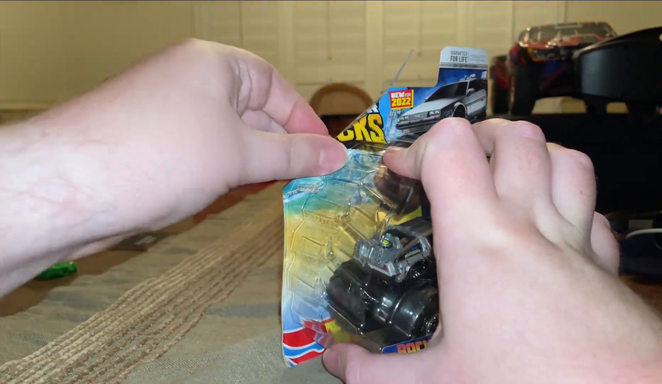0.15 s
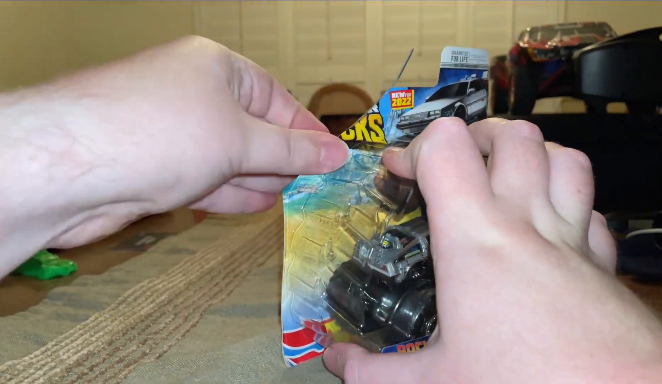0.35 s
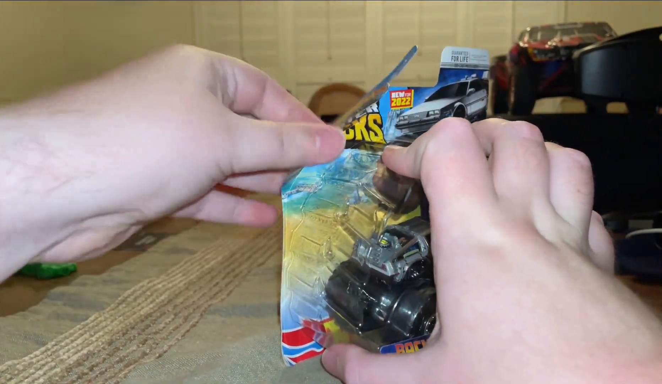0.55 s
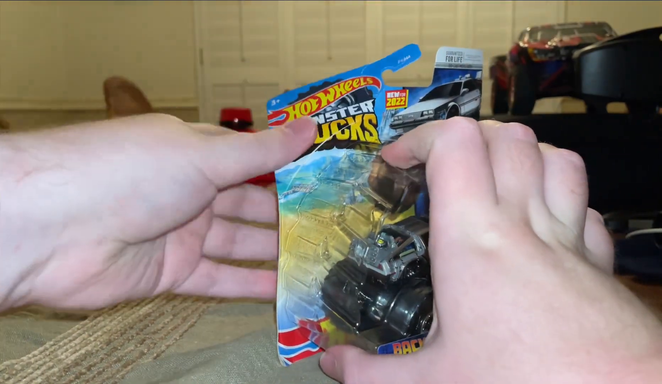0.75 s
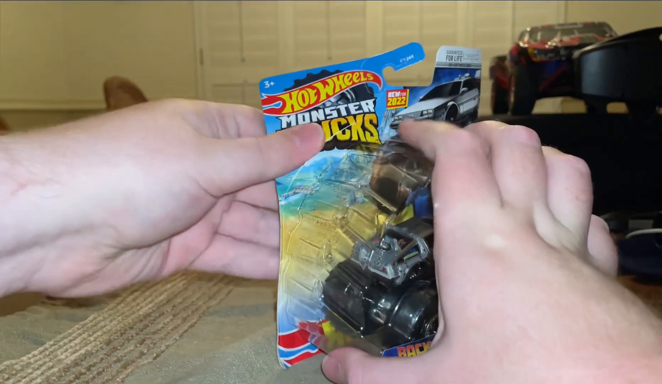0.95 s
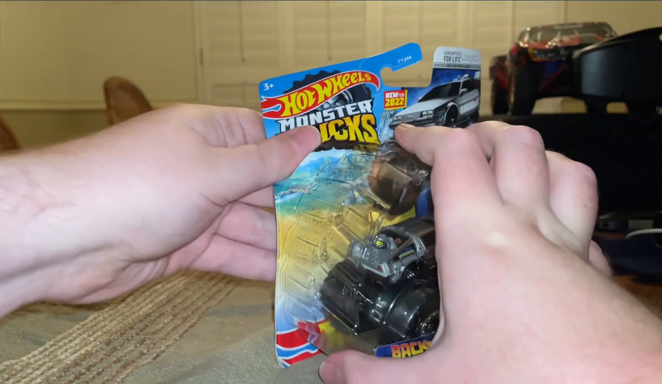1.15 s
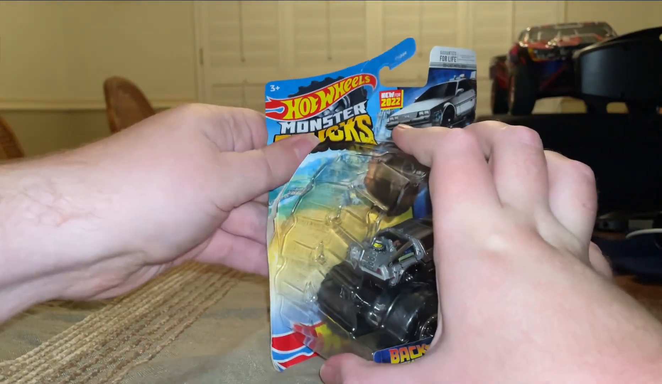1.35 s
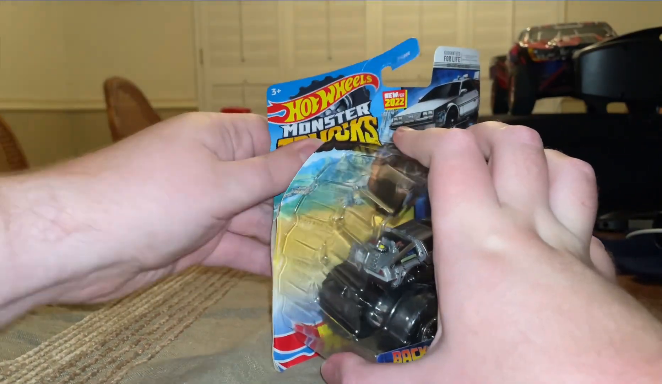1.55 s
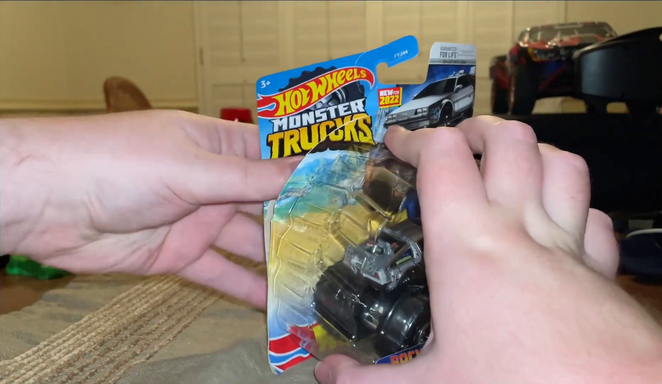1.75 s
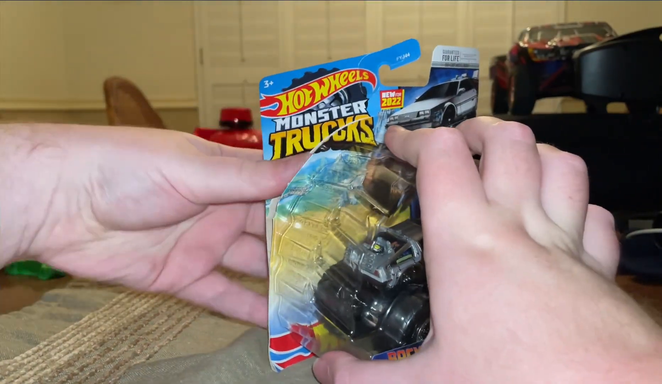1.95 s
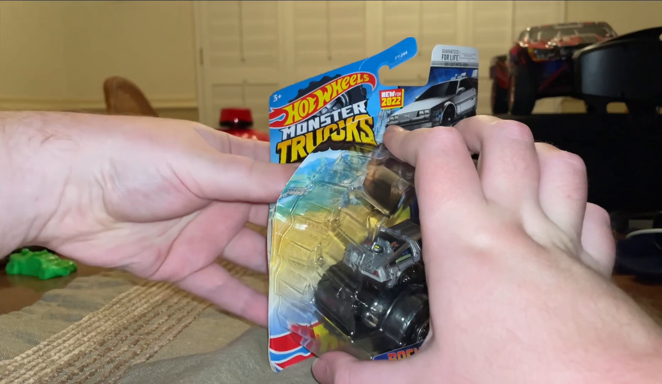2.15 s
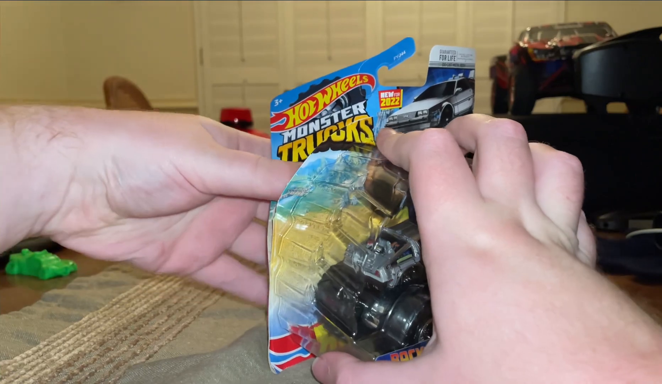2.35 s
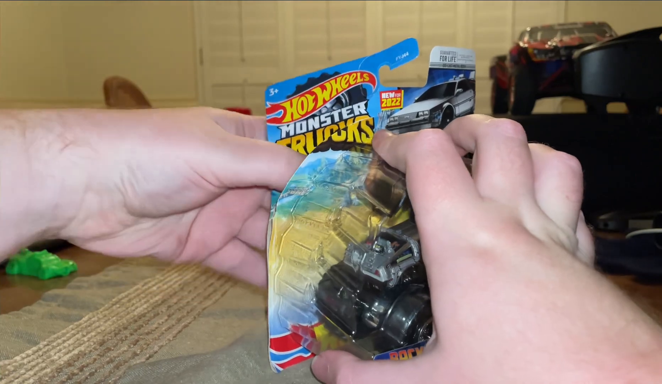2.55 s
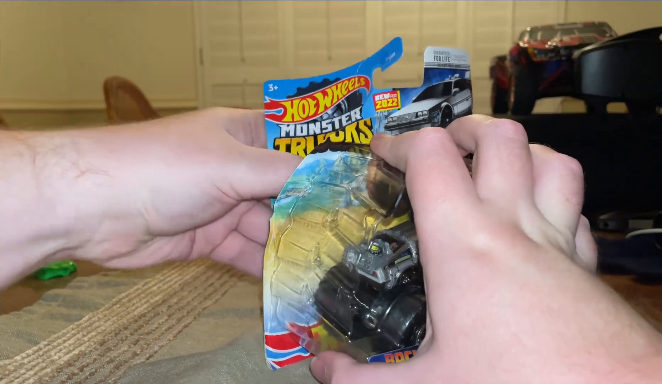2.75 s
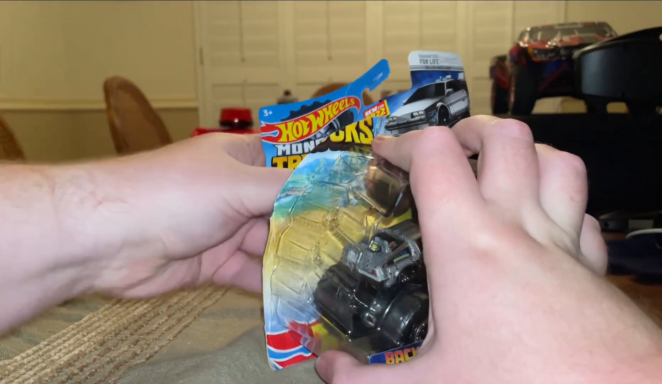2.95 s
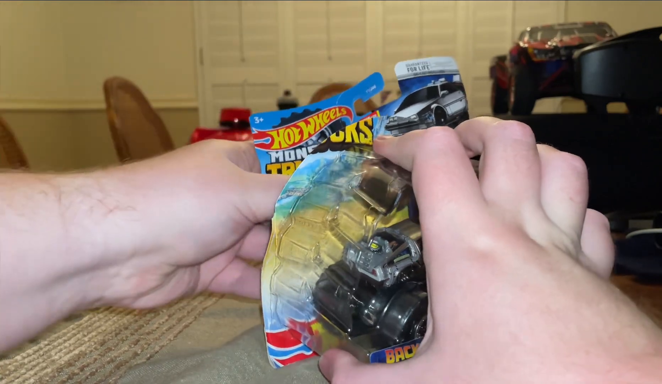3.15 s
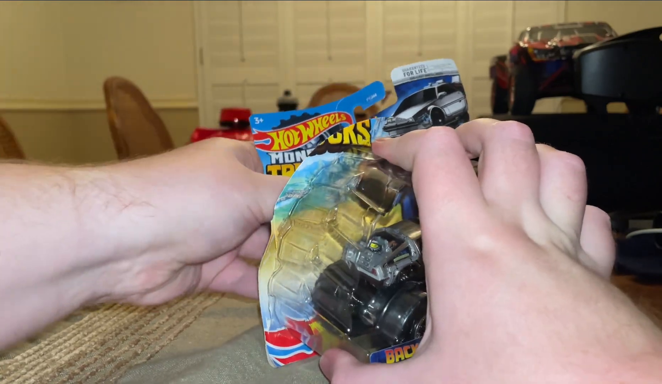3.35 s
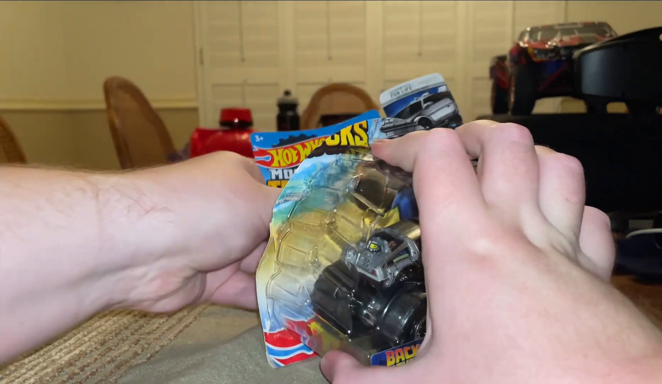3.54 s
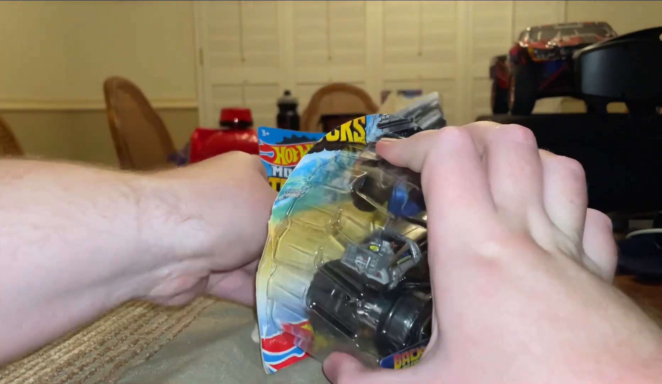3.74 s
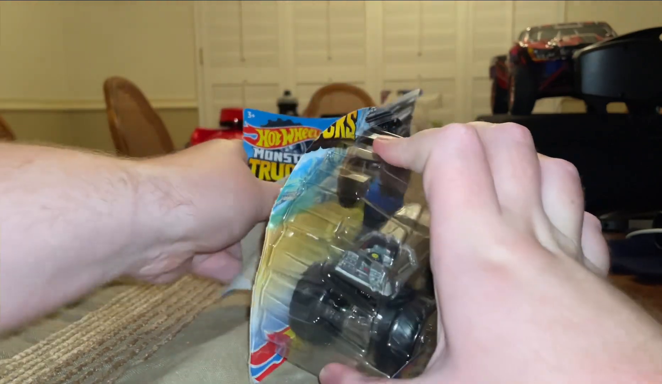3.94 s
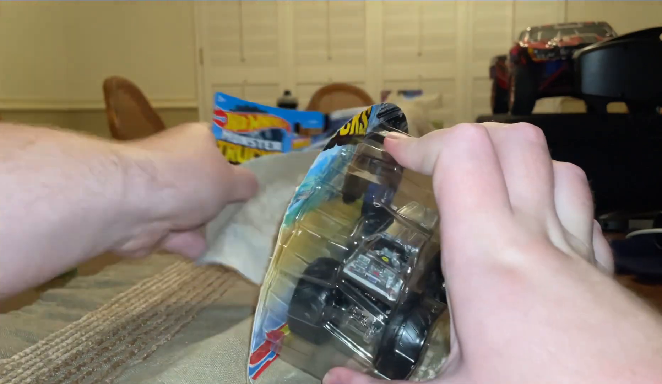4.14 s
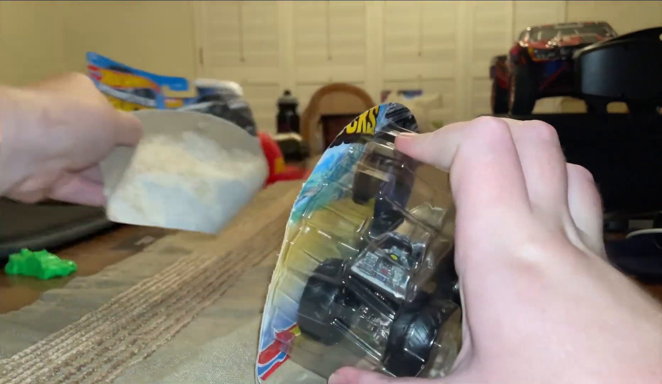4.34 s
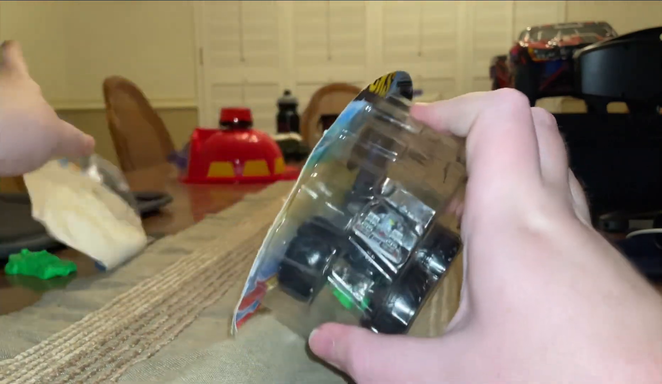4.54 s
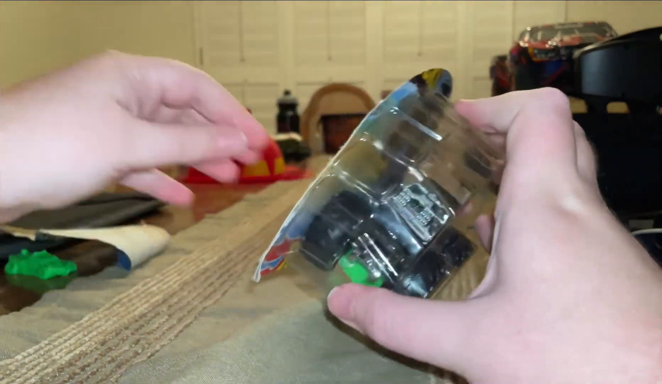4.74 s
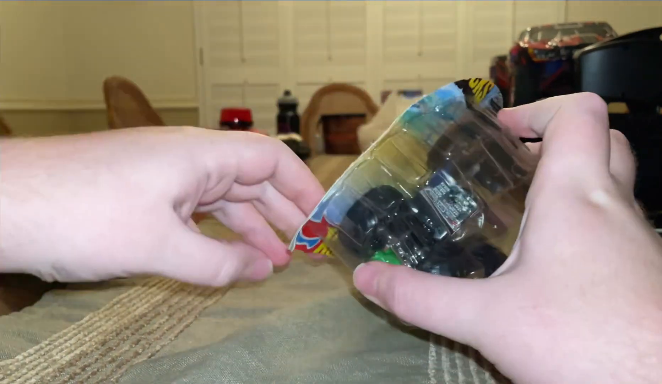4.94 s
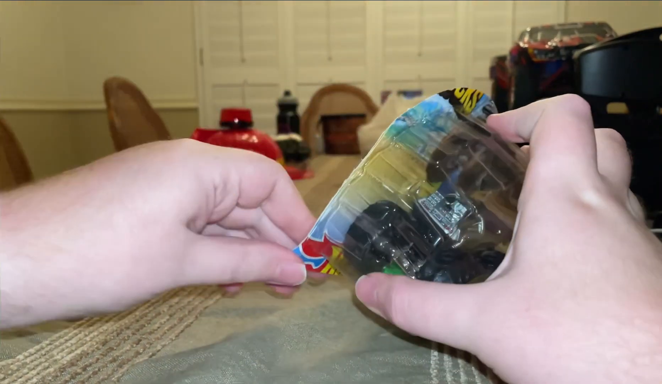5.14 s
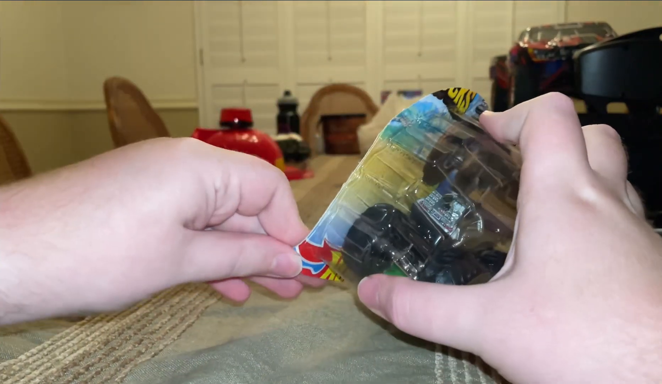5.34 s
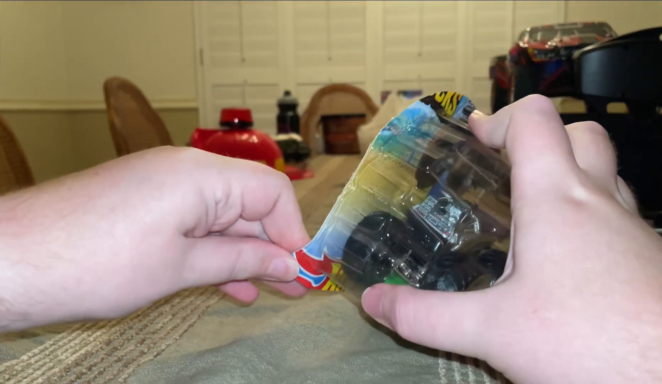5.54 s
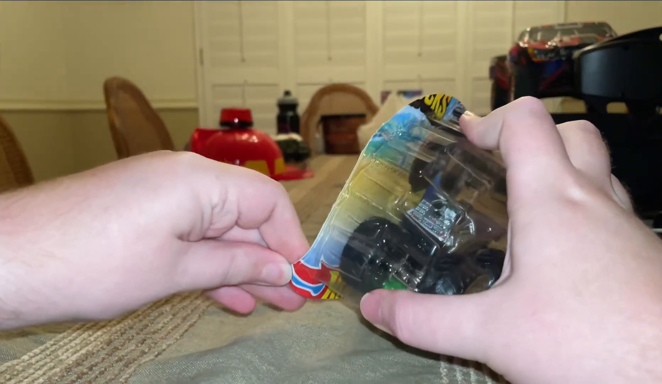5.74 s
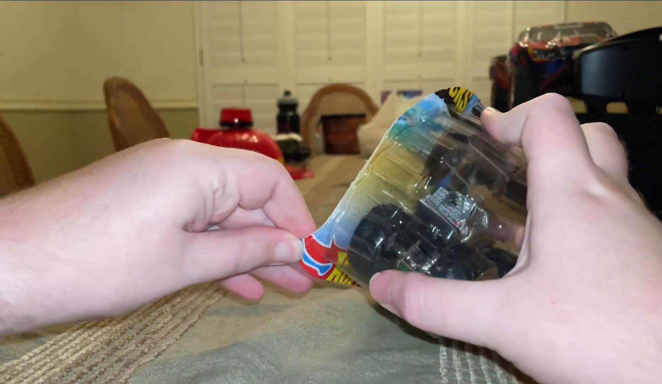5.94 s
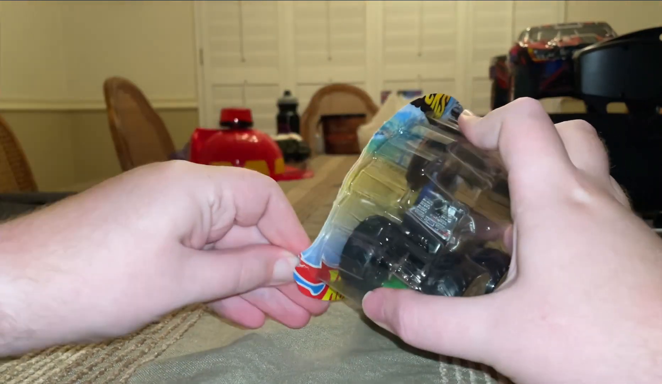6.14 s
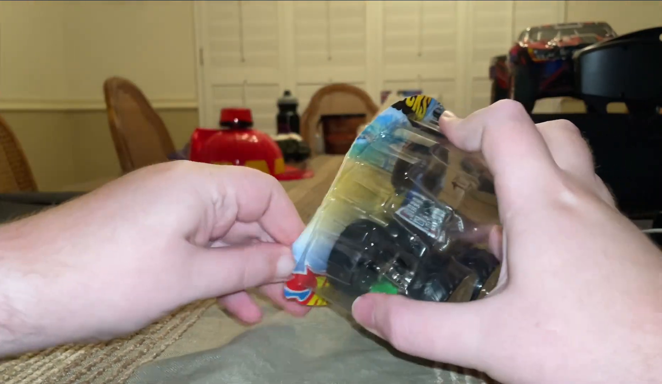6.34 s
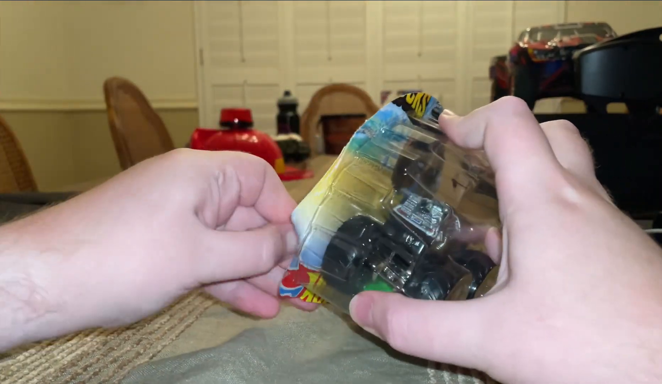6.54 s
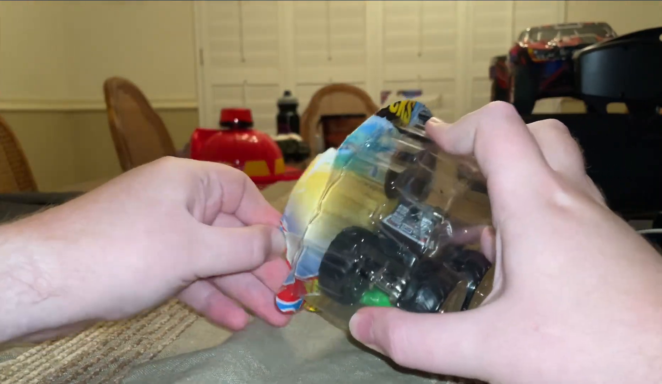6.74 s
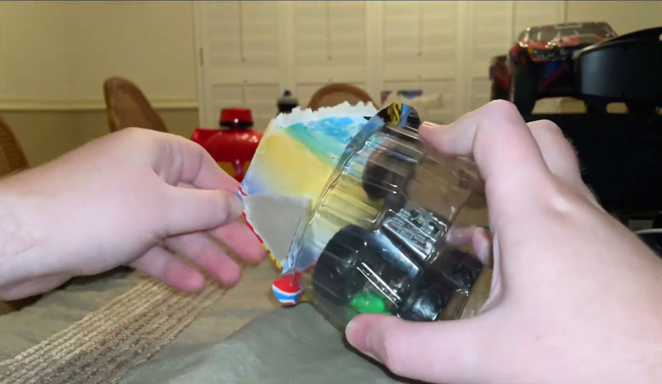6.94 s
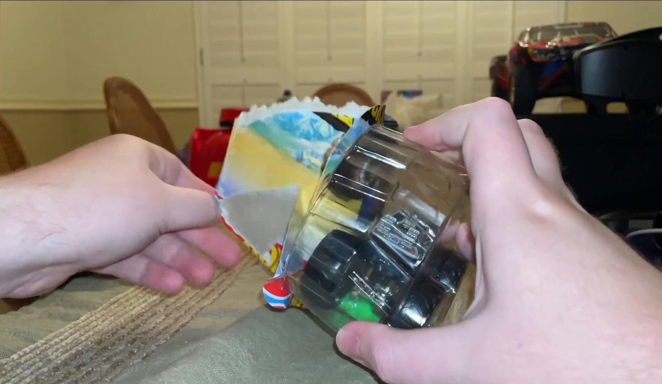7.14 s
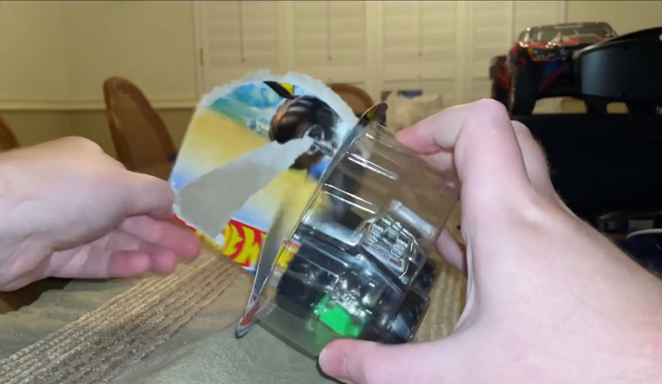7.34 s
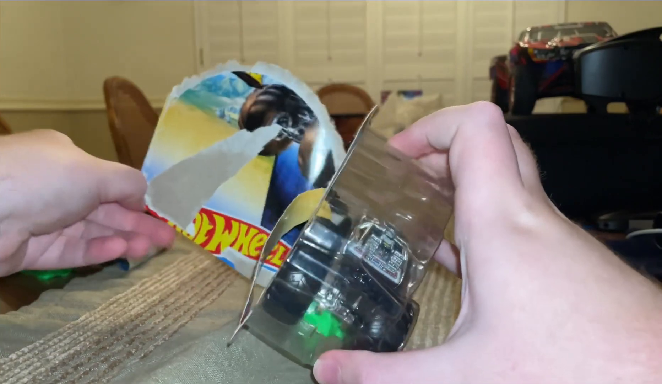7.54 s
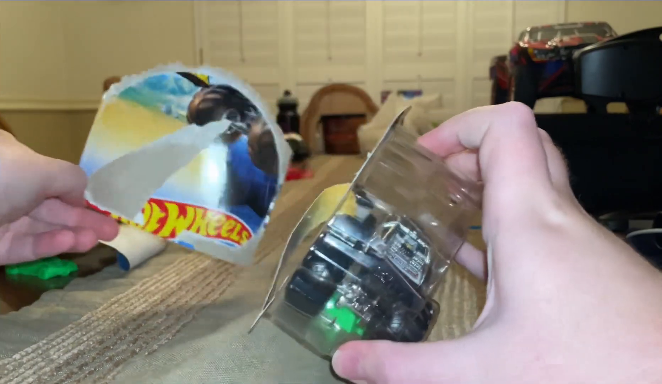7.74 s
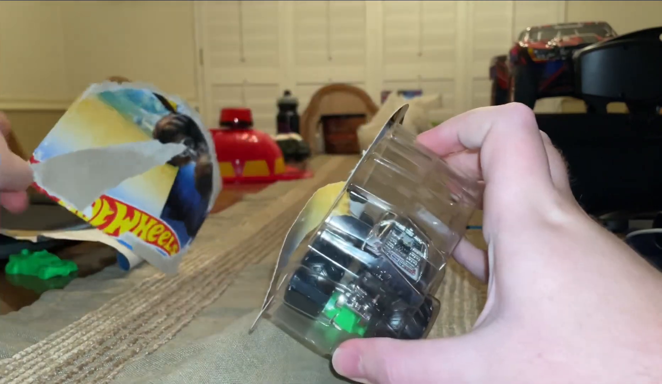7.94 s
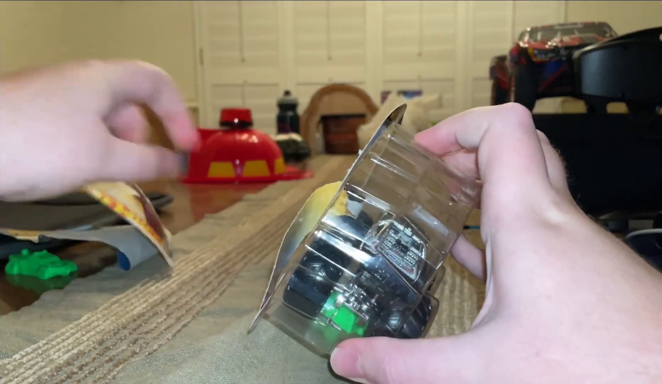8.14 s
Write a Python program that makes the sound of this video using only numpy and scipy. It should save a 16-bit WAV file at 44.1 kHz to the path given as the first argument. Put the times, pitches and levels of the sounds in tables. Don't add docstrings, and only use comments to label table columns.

```python
import sys
import numpy as np
from scipy import signal
from scipy.fft import rfft, irfft, next_fast_len
from scipy.io import wavfile
from scipy.ndimage import uniform_filter1d, map_coordinates

SR = 44100
rng = np.random.default_rng(int(sys.argv[2]) if len(sys.argv) > 2 else 0)


def ratio(d):
    e = np.asarray(d, float) / 20
    return 10 ** e


def output_pcm(signal):
    pcm = np.clip(np.atleast_2d(signal).T, -1, 1) * 32767
    wavfile.write(sys.argv[1], SR, np.round(pcm).astype(np.int16))


N = 361179


def unit(x):
    return x / np.sqrt(np.mean(x ** 2) + 1e-20)


def along(points, hz):
    f, v = np.transpose(points)
    return np.interp(np.log(hz + 1), np.log(f + 1), v)


def wobble(rate):
    knots = rng.standard_normal(int(N * rate / SR) + 4)
    return map_coordinates(knots, [np.arange(N) * rate / SR])


def filtered(x, response):
    m = next_fast_len(N + SR // 2)
    hz = np.fft.rfftfreq(m, 1 / SR)
    return irfft(rfft(x, m) * response(hz), m)[..., :N]


def resonant(modes):
    def response(f):
        total = 0
        for k, (centre, width, db) in enumerate(modes):
            total = total + (-1) ** k * ratio(db) * 1j * f * width / (centre ** 2 - f * f + 1j * f * width)
        return total
    return response


def narrow(hz, width_hz, size):
    pole = np.exp(-np.pi * width_hz / SR)
    poles = [1, -2 * pole * np.cos(2 * np.pi * hz / SR), pole ** 2]
    return unit(signal.lfilter([1, 0, -1], poles, rng.standard_normal(size)))


def swell(t, peak, rise, t60):
    return np.where(t < peak, np.exp((t - peak) / rise), ratio(-60 * (t - peak) / t60))


# frequency in Hz, likeness from -1 to 1.
LIKENESS = [(100, .3), (800, .8), (2000, .42), (4500, .2), (8000, .6), (10200, .97), (13000, .97),
            (16000, .9)]


def spread(pair, response):
    def middle_and_side(hz):
        turn = np.arccos(np.clip(along(LIKENESS, hz), -1, 1)) / 2
        return response(hz) * np.array([np.cos(turn), np.sin(turn)])
    mid, side = filtered(pair, middle_and_side)
    return np.array([mid + side, mid - side])


# frequency in Hz, level in dB per Hz.
AIR_COLOUR = [(15, -39), (25, -3), (175, -8), (217, -11.5), (317, -9), (545, -29.5), (3520, -36.5),
              (7710, -49.5), (11600, -53), (14400, -41), (16000, -49)]
# pitch in Hz, level in dB rms.
HUM_TONES = [(161.5, -68), (242.2, -71), (355.3, -71.5)]


def household():
    a, b = filtered(rng.standard_normal((2, N)), lambda hz: ratio(along(AIR_COLOUR, hz)))
    air = ratio(-58.0 + 0.57 * wobble(1.3)) * unit(np.array([a + 0.64 * b, a - 0.86 * b]))
    t = np.arange(N) / SR
    hum = np.zeros(N)
    for hz, db in HUM_TONES:
        level = ratio(db + 4.5 + 2.0 * wobble(3.5))
        hum += level * np.sin(2 * np.pi * hz * t + .6 * wobble(6))
    return air + hum


# frequency in Hz, time to fall 60 dB in seconds.
ROOM_DECAY = [(100, 0.89), (500, 0.082), (1000, 0.5), (2000, 0.32), (6000, 0.63), (12000, 0.095)]
# frequency in Hz, level in dB.
ROOM_LEVEL = [(100, -16), (600, -10.5), (1100, -14.5), (1450, -15), (2200, -11), (6000, -16),
              (12000, -16.5)]


def room(x):
    out, step, delay = np.zeros((2, N + 2 * SR)), SR // 3, 200
    for start in range(0, N, step):
        hz, t, z = signal.stft(rng.standard_normal((2, SR // 2)), SR, nperseg=256)
        decay = ratio(-60 * t / along(ROOM_DECAY, hz)[:, None])
        tail = signal.istft(z * decay, SR, nperseg=256)[1]
        tail = tail / np.linalg.norm(tail[0])
        wet = signal.fftconvolve(x[None, start:start + step], tail, axes=1)
        out[:, start + delay:start + delay + wet.shape[1]] += wet
    return spread(out[:, :N], lambda hz: ratio(along(ROOM_LEVEL, hz)))


# peak time in seconds, peak level in dB.
TABLE_KNOCKS = [(0.672, -41.5), (1.303, -48), (1.601, -28), (2.418, -39.5), (3.136, -50.5), (3.348, -51.5),
                (3.646, -29.5), (3.746, -32), (3.848, -30), (4.066, -40.5), (4.18, -42), (4.89, -35),
                (6.496, -26.5), (6.819, -23), (7.006, -54), (7.132, -47.5), (7.207, -23.5), (7.365, -21.5),
                (7.644, -22)]


def thuds():
    out, t, peak = np.zeros(N + SR), np.arange(SR // 4) / SR, .03
    for s, db in TABLE_KNOCKS:
        boom = narrow(86, 75, len(t)) * swell(t, peak, 0.037, 0.037)
        out[round((s - peak) * SR):][:len(t)] += ratio(db - 7.5) * boom
    return out[:N]


# peak time in seconds, growing time in seconds, level in dB, pitch in Hz,
# time to fall 60 dB in seconds.
FINGER_DRAGS = [(0.348, 0.12, -52.5, 9900, .05), (.665, .006, -35, 620, 0.11),
                (.69, 0.021, -31.5, 340, 0.29), (1.02, 0.011, -42, 1090, 0.36),
                (1.02, 0.014, -55, 2370, 0.26), (1.288, 0.23, -47.5, 6800, .05),
                (1.89, 0.057, -32.5, 964, 0.056), (1.9, 0.054, -50.5, 4600, .05),
                (1.898, .05, -53, 5960, .05), (2.022, .03, -42, 940, .08), (2.02, 0.033, -47.5, 5000, .06),
                (3.36, 0.014, -27, 344, 0.36), (5.42, .08, -73, 6530, .05)]


def drags():
    growth_db, sharpness = 11.5, 20
    out = np.zeros(N + SR)
    for end, length, db, hz, t60 in FINGER_DRAGS:
        t = np.arange(SR // 2) / SR - length
        stroke = np.where(t < 0, ratio(growth_db * t / length), ratio(-60 * t / t60))
        stroke = stroke * np.minimum((t + length) / .01, 1)
        hiss = narrow(hz, hz / sharpness, len(t))
        out[round((end - length) * SR):][:len(t)] += ratio(db) * stroke * hiss
    return out[:N] * ratio(2 * wobble(87))


# peak time in seconds, peak level in dB, pitch in Hz, time to fall 60 dB in seconds,
# level of the edge crack in dB.
PANEL_SNAPS = [(0.6592, -9, 416, 0.0024, -32), (0.9987, -6.5, 1050, 0.025, -22.5),
               (1.3013, -7, 1035, 0.018, -4), (1.4176, -5.5, 797, 0.017, -3),
               (2.7277, -3.5, 620, 0.025, -23), (3.1191, -8, 815, 0.011, -28.5),
               (3.338, -1, 270, 0.032, -45.5), (3.7274, -32, 920, 0.04, -25.5),
               (3.8379, -10.5, 746, 0.015, -23), (3.884, -10.5, 1103, 0.0091, -19.5),
               (3.9455, -16.5, 860, 0.041, -28.5), (4.172, -57, 1096, .07, -41),
               (4.2065, -16, 1090, 0.02, -17), (4.6268, -18, 1100, 0.022, -36.5),
               (6.737, -8.5, 810, 0.026, -30), (6.769, -12, 994, 0.039, -19.5),
               (6.809, -2.5, 683, 0.052, -15), (6.941, -8, 837, .039, -10.5), (7.1135, 2, 818, 0.032, -16),
               (7.1975, -1, 956, 0.02, -46.5), (7.2629, -12, 684, 0.057, -18),
               (7.3543, -9.5, 710, 0.0057, -15), (7.6331, -6.5, 790, 0.015, -14.5),
               (7.6675, -11, 960, 0.032, -25)]
# peak time in seconds, peak level in dB, pitch in Hz.
SHELL_DENTS = [(.0545, -39, 674), (.0895, -31.5, 633), (.1026, -31, 636), (.3423, -25, 940),
               (.3565, -32, 570), (0.396, -33, 1310), (.656, -20.5, 1720), (1.001, -22, 2370),
               (1.045, -29, 1130), (1.06, -34.5, 1119), (1.283, -23.5, 740), (1.352, -25, 950),
               (1.715, -32, 860), (5.4, -46, 996), (5.875, -52, 1850), (1.2665, -26.5, 1120),
               (1.4164, -3, 1800), (2.0123, -29, 734), (2.2298, -31, 860), (2.7244, -13, 1800),
               (1.85, -24.5, 1030), (2.952, -23, 1120), (3.12, -13.5, 1750), (1.952, -32.5, 900),
               (2.178, -45, 880), (2.32, -42, 860), (1.592, -25, 1160), (1.592, -27, 1890),
               (3.8539, -13.5, 730), (4.9182, -39.5, 720), (5.0101, -34, 980), (5.2898, -41.5, 620),
               (5.913, -47, 870), (6.271, -26, 620), (6.722, -20.5, 710), (6.7482, -21, 840),
               (7.1528, -12, 820), (7.5234, -26, 1020), (7.5867, -19.5, 795), (7.605, -12, 1030)]
# peak time in seconds, peak level in dB, pitch in Hz.
CARD_FLEXES = [(0.193, -36.5, 252), (0.5134, -53, 350), (0.669, -16, 490), (0.6832, -17.5, 370),
               (1.583, -23, 424), (1.596, -24, 177), (1.824, -33, 421), (2.7263, -12.5, 389),
               (3.1204, -11.5, 376), (3.343, -8, 340), (3.164, -21.5, 342), (3.3992, -25, 300),
               (3.6303, -25, 367), (4.0489, -27.5, 284), (4.428, -42, 289), (4.849, -41, 751),
               (5.912, -46, 299), (6.072, -45, 446), (6.33, -37, 170), (6.484, -20.5, 395)]


def pops():
    ring_s, ring_falls = .036, 0.91
    rattle_base_db, rattle_grows = -15.5, 0.32
    rim_damp_db = 7
    out, t, peak = np.zeros(N + SR), np.arange(SR // 5) / SR, .006
    events = [row[:4] for row in PANEL_SNAPS]
    for s, db, hz in SHELL_DENTS + CARD_FLEXES:
        events.append((s, db, hz, ring_s * (700 / hz) ** ring_falls))
    for s, db, hz, t60 in events:
        draw = rng.standard_normal((4, 3)) * [[0], [1], [1], [1]]
        ratios = np.array([1, .82, 1.22, 1.6]) * (1 + .05 * draw[:, 0])
        sizes = ratio(np.array([0, -10, -16, -20]) + 2 * draw[:, 1])
        phase = 2 * np.pi * hz * ratios[:, None] * (t - peak) + .6 * draw[:, 2:]
        damping = ratio(-30 * (np.maximum(t - peak, 0) / t60) ** 2)
        pop = sizes @ np.cos(phase) * swell(t, peak, 0.58 / hz, t60) * damping
        rattle_db = rattle_base_db - (1 - rattle_grows) * (db + 40.5) - rim_damp_db * (hz > 1500)
        rattle = ratio(rattle_db - 1.5) * narrow(hz, .03 * hz, len(t)) * swell(t, peak + .008, .002, .22)
        out[round((s - peak) * SR):][:len(t)] += ratio(db - 4.5) * (pop + rattle)
    return out[:N]


# peak time in seconds, peak level in dB,
# pitch in Hz.
LOOSE_TICKS = [(.1865, -30.5, 7050), (0.3049, -30, 9800), (0.3427, -14.5, 11500), (0.6564, -9.5, 3430),
               (1.1089, -35, 8500), (1.2214, -27, 6900), (1.2646, -19.5, 6260), (1.2837, -22.5, 4040),
               (1.579, -41.5, 6630), (1.5902, -29.5, 5560), (1.9525, -40.5, 4800), (1.9977, -33, 4460),
               (2.0077, -25.5, 5700), (2.3173, -40, 2780), (2.4792, -29, 9400), (2.5583, -28, 4870),
               (2.6278, -33, 5200), (3.7192, -22, 2910), (3.848, -24, 4760), (4.5798, -33, 5700),
               (5.5218, -39, 6500), (6.1123, -40, 10560), (6.1565, -30, 9050), (6.241, -28.5, 8100),
               (6.3304, -32, 8250), (6.3417, -15.5, 6050), (6.4605, -28.5, 4940), (6.7026, -33.5, 3600),
               (7.5658, -43, 4890), (8.145, -46.5, 4940),
               (.822, -47, 3500), (1.079, -43, 7330), (2.229, -46, 3000), (2.278, -47.5, 5000),
                  (2.515, -41.5, 7500), (2.588, -40.5, 5000), (1.089, -43, 7950), (2.915, -29, 3020),
                  (3.0082, -25, 2610), (3.088, -30, 2500), (3.2356, -37, 2500), (3.2646, -37.5, 5960),
                  (3.2841, -38, 5400), (3.3901, -27, 7000), (3.5943, -30.5, 2440), (3.7119, -24, 2500),
                  (4.0328, -32, 2500), (4.168, -26, 4670), (5.009, -51, 3000), (5.437, -54, 8500),
                  (5.87, -55, 6000), (6.4796, -29, 9860), (6.5177, -27.5, 5070), (6.6109, -37, 2600),
                  (6.6819, -36, 5950), (6.7183, -28, 2500), (6.7623, -29.5, 2500), (7.0608, -32, 2500),
                  (7.0878, -27, 6085), (7.3093, -34.5, 3540), (7.3267, -26, 2500), (7.384, -24, 3980),
                  (7.6006, -22.5, 2710)]
# frequency in Hz, level in dB per Hz.
FIBRE_COLOUR = [(900, -9.5), (2000, 1.5), (4000, -1), (7000, -4.5), (10000, -7), (13000, -16),
                (15600, -10.5), (16300, -54.5)]


def ticks():
    out, t, peak = np.zeros((2, N + SR)), np.arange(SR // 40) / SR, .003
    cracks = [(s - 0.0017, db, 5800) for s, *_, db in PANEL_SNAPS]
    for s, db, hz in LOOSE_TICKS + cracks:
        middle = np.array([[1], [0]]) * narrow(hz, 6000, len(t))
        wide = np.array([narrow(hz, 1.5 * hz, len(t)), narrow(hz, 1.5 * hz, len(t))])
        burst = (middle + .45 * wide) * swell(t, peak, .0003, .006)
        out[:, round((s - peak) * SR):][:, :len(t)] += ratio(db - 4) * burst
    return ratio(0.5) * spread(out[:, :N], lambda hz: ratio(along(FIBRE_COLOUR, hz) / 3))


def breaks(rate, spread_db, rub):
    draw = rng.random((2, 2, N))
    sizes = ratio(-spread_db * np.log(draw[1] + .02))
    hits = (draw[0] < rate / SR) * sizes * np.sign(rng.standard_normal((2, N)))
    return unit(hits) + rub * rng.standard_normal((2, N))


def patchy(x, depth_db):
    z = signal.stft(x, nperseg=128)[2]
    field = uniform_filter1d(rng.standard_normal(z.shape[1:]), 3, 0)
    field = uniform_filter1d(field, 25, 1)
    return signal.istft(z * ratio(depth_db * unit(field)), nperseg=128)[1][:, :N]


# time in seconds, strain in dB, fibre share in dB.
STEADY_STRAIN = [(0, -52, -12), (.3, -58, -16), (.97, -60, -9), (1.25, -58.5, 3), (1.45, -48.5, -10),
                 (1.9, -50.5, -7.5), (2.13, -64.5, -14), (2.68, -53.5, 7.5), (2.8, -36.5, 0.5),
                 (3.08, -48.5, 1.5), (4.148, -38.5, -8.5), (4.499, -68.5, 1), (5.251, -78, 1.5),
                 (6.051, -72, -8.5), (6.55, -44.5, -8.5), (6.95, -38.5, 2), (7.701, -51, -6),
                 (8.0, -75, -10)]
# peak time in seconds, strength in dB, fibre share in dB, card share in dB.
CORNER_TUGS = [(0.345, -42.5, -1, 3.5), (0.85, -47, -17, 7.5), (1.225, -49.5, 3, -7.5),
               (1.304, -25, -4, 0.5), (1.37, -36.5, -1, -3), (1.82, -42, -8.5, 4.5), (1.882, -42.5, -11, 3),
               (2.324, -54.5, -7, 13), (2.419, -50.5, -2.5, 15), (2.554, -48.5, 3, 7.5)]
# peak time in seconds, strength in dB, fibre share in dB, card share in dB.
RIPPING_TUGS = [(2.778, -27, -3.5, -12), (2.86, -35.5, -9, -21.5), (2.945, -21, -13.5, -12.5),
                (3.017, -33, -6, -5), (3.171, -38, -4.5, 2), (3.3, -37, -6.5, -5), (3.47, -34.5, -8.5, -6),
                (3.507, -25.5, -7, -4.5), (3.535, -34.5, -10, -8), (3.605, -33.5, -2.5, -7),
                (3.633, -24.5, -6.5, -7), (3.732, -21, -4, 1), (3.755, -35, -6, 5), (3.82, -32, -3, -1),
                (3.855, -28, -1, 5), (3.9, -31, -6.5, 3), (3.925, -32, -7, 6.5), (3.945, -26.5, -4, 1),
                (3.975, -36, -13, -7.5), (4.052, -32.5, 0, -5), (4.085, -34.5, -6, 2.5),
                (4.12, -32.5, -1, 3.5), (4.15, -30, -5, -0.5), (4.175, -29.5, -0.5, 4.5),
                (4.209, -31, 0.5, 3), (4.239, -38.5, -4.5, -2), (4.68, -49, -11, 11),
                (4.731, -47, -0.5, -7), (5.018, -50, -23, 4), (5.139, -59, -7.5, 9),
                (5.401, -60.5, -8.5, -1), (5.935, -73.5, -10, 23)]
# peak time in seconds, strength in dB, fibre share in dB, card share in dB.
PEELING_TUGS = [(6.15, -59, 5.5, 14), (6.241, -41, -11, 2), (6.36, -31.5, -9.5, 2), (6.495, -39, -2, 0),
                (6.534, -38, -1.5, 1), (6.742, -31, -5.5, -4), (6.775, -28.5, -5.5, 7),
                (6.811, -20.5, -4.5, 1.5), (6.844, -27.5, -11.5, -5), (6.91, -36, -5.5, 0),
                (6.992, -28, -6.5, -1.5), (7.049, -41, -13, -3), (7.17, -23.5, -9, -7.5),
                (7.197, -29, 0.5, 10), (7.225, -32.5, -4, 0.5), (7.26, -23.5, -5.5, -7.5),
                (7.335, -36, -3.5, -6), (7.356, -21.5, -6.5, -4.5), (7.385, -29.5, -7, -2),
                (7.414, -47, -11, -12), (7.577, -43.5, 13, 4.5), (7.664, -21.5, -14, -6.5)]
# time in seconds, strength in dB, fibre share in dB, card share in dB.
GLUE_PATCHES = [(0.186, -48.5, -16, 15.5), (0.507, -46.5, -6, 13), (.658, -31.5, -31, 11.5),
                (1.42, -38, 5, 11), (1.58, -37.5, -4, 7.5), (1.849, -39.5, -6, -13), (2.0, -41.5, -7, 1),
                (2.732, -20.5, -2, -5), (3.121, -32, -3.5, 7.5), (3.336, -33.5, -26.5, 17),
                (3.719, -25.5, -2.5, -11), (4.579, -49.5, 18, -6), (4.625, -35.5, 4, 4),
                (6.702, -25.5, -14, 0), (7.113, -26.5, -10, 6.5), (8.138, -81.5, 20, -0.5)]


def pull():
    tug_rise, patch_rise, fall = 325.5, 3000, 217
    hard_speeds_up = 0.015
    t = np.arange(N) / SR
    s, strain_db, fibre_db = np.transpose(STEADY_STRAIN)
    shares_db = np.array([0 * t, np.interp(t, s, fibre_db), 1 + 0 * t])
    power = ratio(np.interp(t, s, strain_db) + shares_db) ** 2
    tugs = [(tug_rise, row) for row in CORNER_TUGS + RIPPING_TUGS + PEELING_TUGS]
    tugs += [(patch_rise, row) for row in GLUE_PATCHES]
    for rise, (s, db, fibre_db, card_db) in tugs:
        near = slice(max(round(s * SR) - SR // 2, 0), round(s * SR) + SR // 2)
        slope = np.where(t[near] < s, rise, -fall) * np.exp(hard_speeds_up * (db + 49.5))
        shares_db = np.array([[0], [fibre_db], [card_db]])
        power[:, near] += ratio(db + slope * (t[near] - s) + shares_db) ** 2
    return np.sqrt(power)


# pitch in Hz, width in Hz, level in dB.
SHELL_MODES = [(620, 160, 0), (860, 87, 4.5), (1074, 158, 2), (1800, 250, -4.5), (2524, 760, -14.5)]
# pitch in Hz, width in Hz, level in dB.
CARD_MODES = [(170, 95, -7.5), (267, 32, -2), (332.5, 46, -1), (458, 130, -3)]
# time in seconds, treble boost in dB.
TEAR_FACING = [(0, -6), (1.4, 5), (1.7, -9), (3.4, 5.5), (4.701, -13.5), (5.2, -5.5), (6.298, 12.5),
               (7.0, 2), (8.19, -9)]


def tearing():
    shell_gain, fizz_gain, card_gain = pull()
    jerk = 1.6 * wobble(55)
    shell = ratio(jerk + 1.5 * wobble(100)) * breaks(900, spread_db=3.2, rub=.45)
    fizz = ratio(jerk + 1.5 * wobble(150)) * breaks(1100, spread_db=4.3, rub=.55)
    card = ratio(jerk + 3.0 * wobble(40)) * breaks(600, spread_db=3.5, rub=0.73)[0]

    shell = unit(spread(patchy(shell, depth_db=5.0), resonant(SHELL_MODES))) * shell_gain

    fizz = unit(spread(patchy(fizz, depth_db=3.5), lambda hz: ratio(along(FIBRE_COLOUR, hz))))
    fizz = fizz * fizz_gain * ratio(-1.5)
    treble = filtered(fizz, lambda hz: 1 / (1 + (7800 / (hz + 1)) ** 6))
    facing_db = np.interp(np.arange(N) / SR, *np.transpose(TEAR_FACING))
    fizz = fizz + treble * (ratio(facing_db) - 1)

    table = unit(filtered(card, lambda hz: resonant([(95, 80, 0)])(hz) ** 2)) * ratio(-17.5)
    card = unit(filtered(card, lambda hz: resonant(CARD_MODES)(hz) / (1 + (hz / 600) ** 4)))
    return shell + fizz + (card + table) * card_gain * ratio(-5.0)


def scene():
    torn = tearing() + ticks() + thuds() + drags()
    popped = pops()
    return torn + popped + room(torn[0] + ratio(-4) * popped) + household()


def band_limit(x):
    return signal.sosfilt(signal.butter(12, 17000, fs=SR, output="sos"), x)


# frequency in Hz, left minus right in dB.
PORT_LEVELS = [(100, -2), (500, -1), (1200, -5), (2400, 0), (5000, -6.5), (10000, -0.5)]
# frequency in Hz, phase in radians.
PORT_LEAD = [(300, .1), (700, 1), (1300, .5), (3000, 2.4), (5300, 3.2), (6400, 5.1), (8000, 3.14),
             (9500, 2.4), (10400, .15), (12400, 0), (13300, -3), (14900, -3.2), (15600, -3.9),
             (16000, -3.7)]


def record(dry):
    half = np.array([[.5], [-.5]])

    def response(hz):
        band = (hz < 15950) * hz ** 2 / (hz ** 2 - 45 ** 2 - 1.4j * 45 * hz)
        level = ratio(half * along(PORT_LEVELS, hz))
        return band * level * np.exp(-1j * half * along(PORT_LEAD, hz) * (hz > 0))

    ports = filtered(dry, response)
    ports = ports / (1 + np.abs(ports / .9) ** 6) ** (1 / 6)
    return band_limit(ports)


dry = scene()
out = record(dry)
output_pcm(out)
```